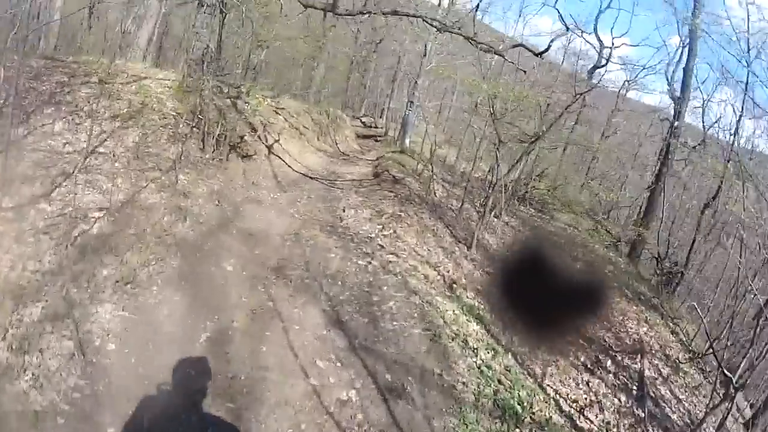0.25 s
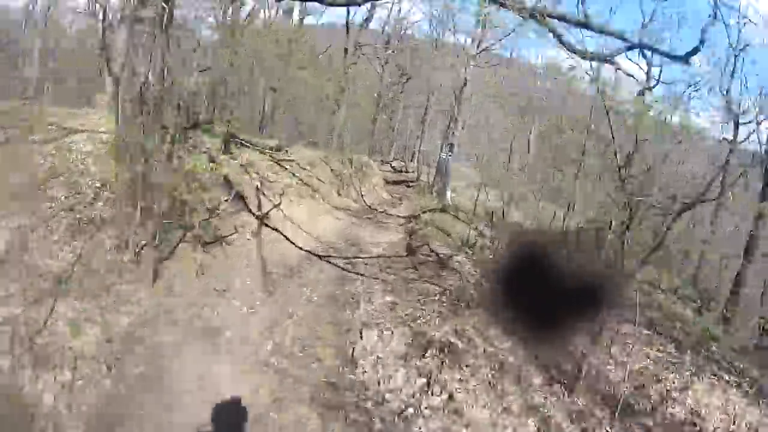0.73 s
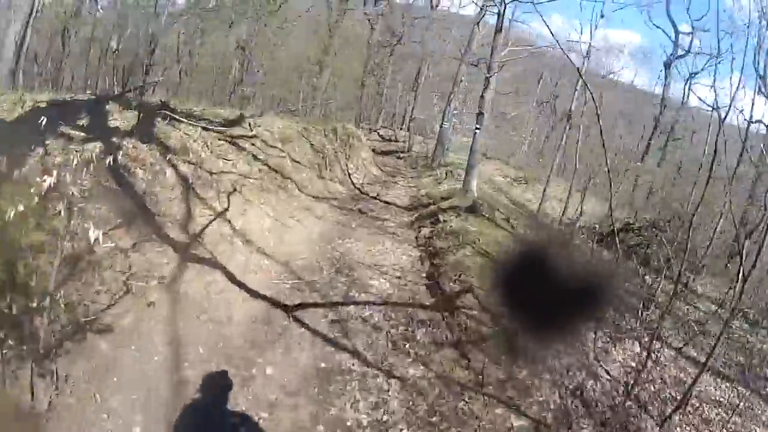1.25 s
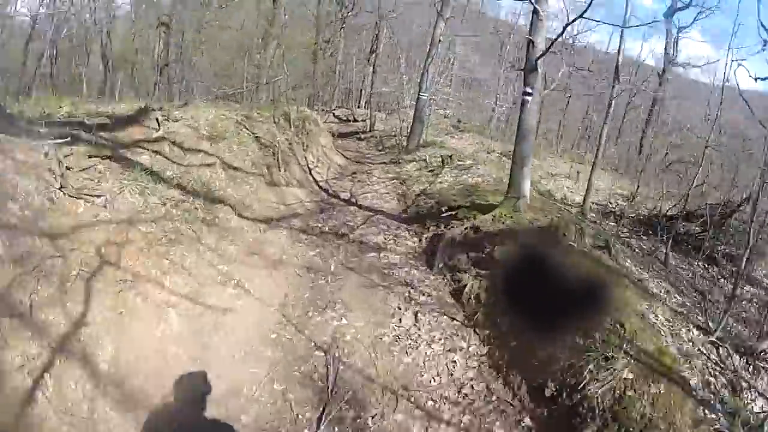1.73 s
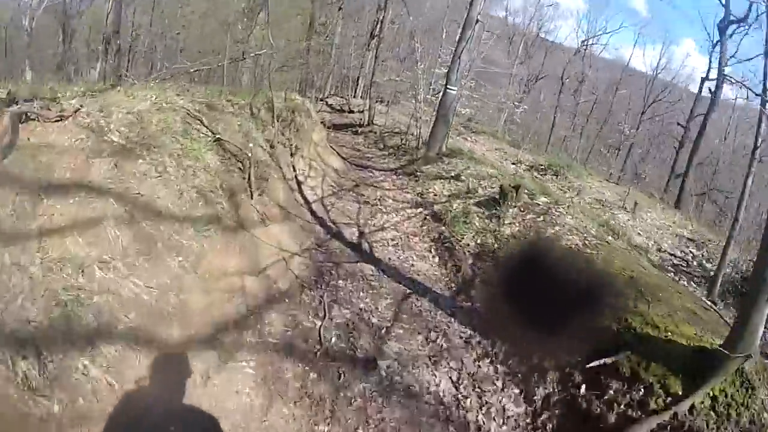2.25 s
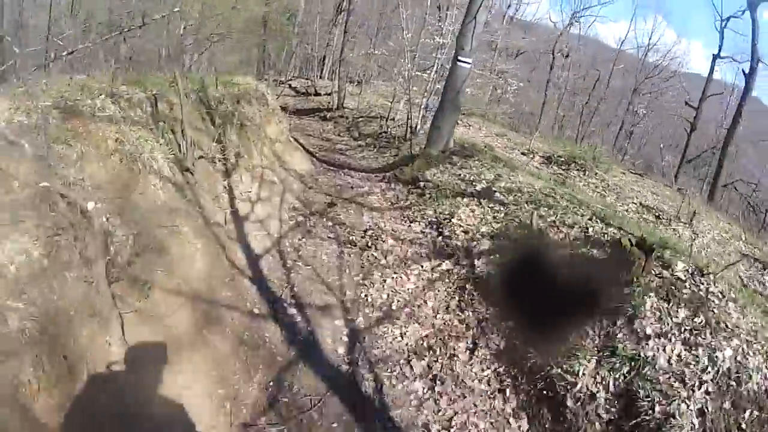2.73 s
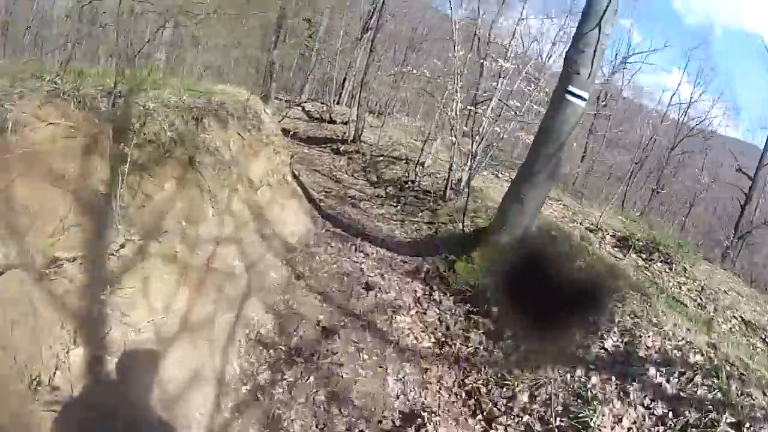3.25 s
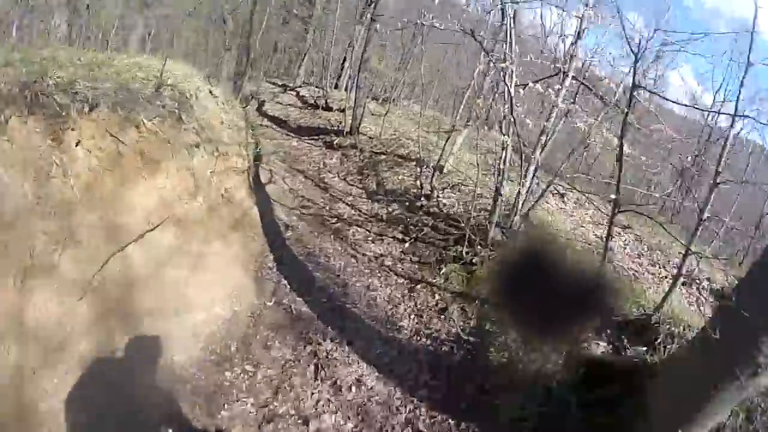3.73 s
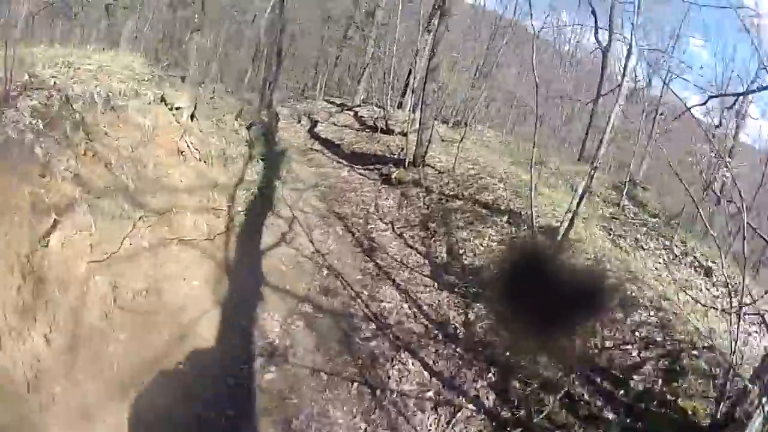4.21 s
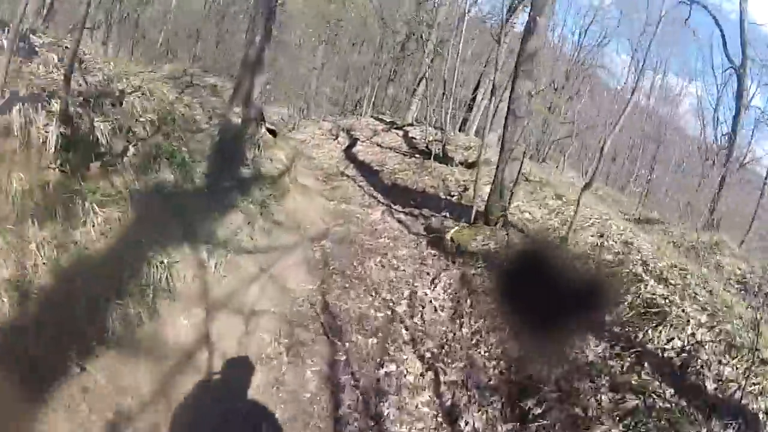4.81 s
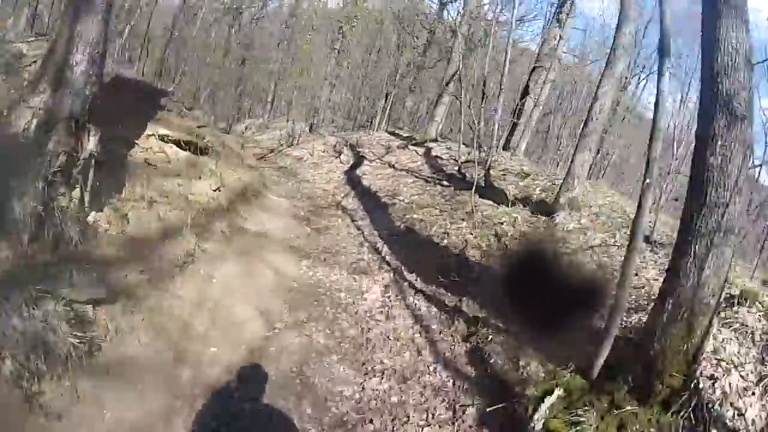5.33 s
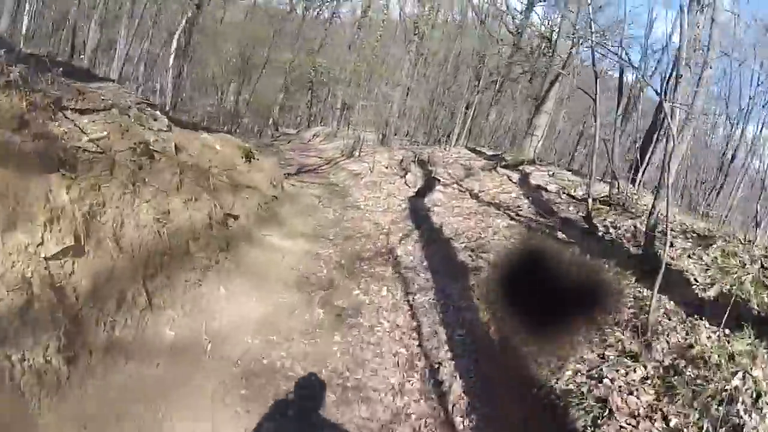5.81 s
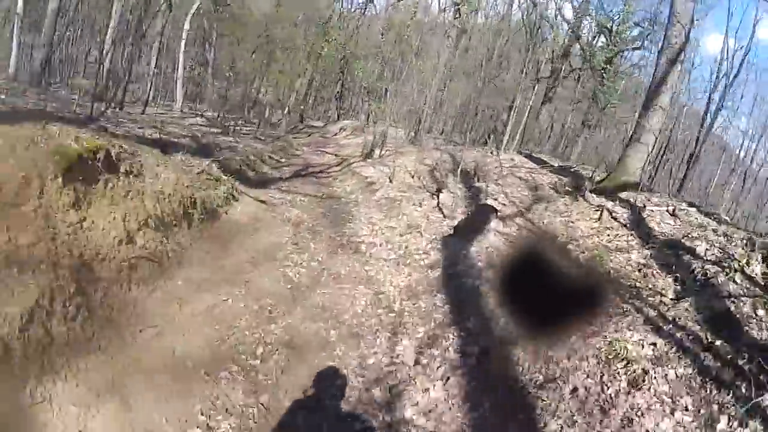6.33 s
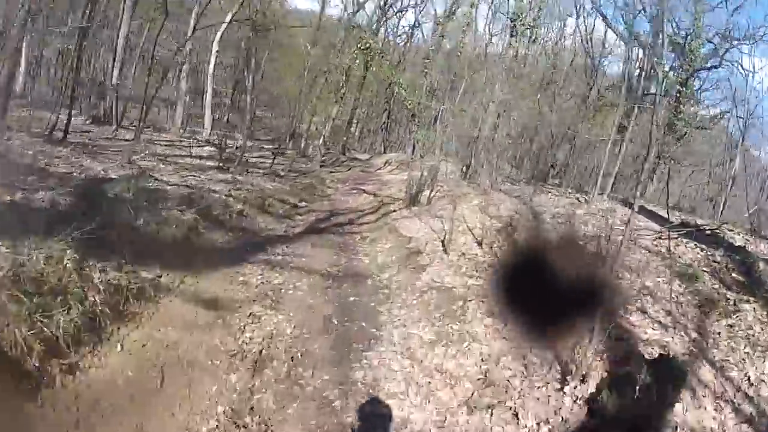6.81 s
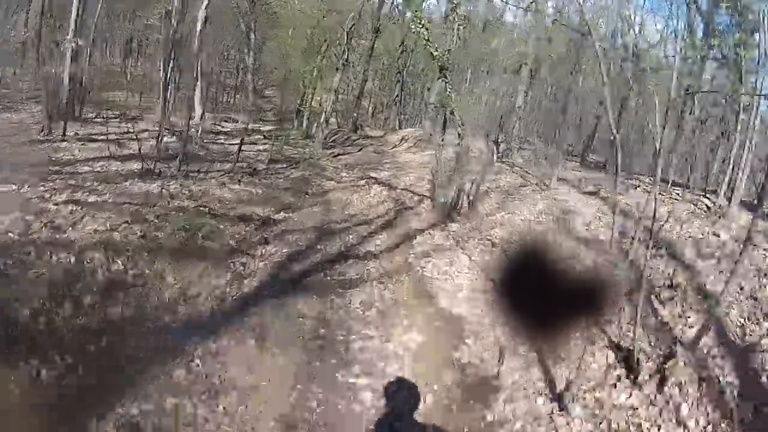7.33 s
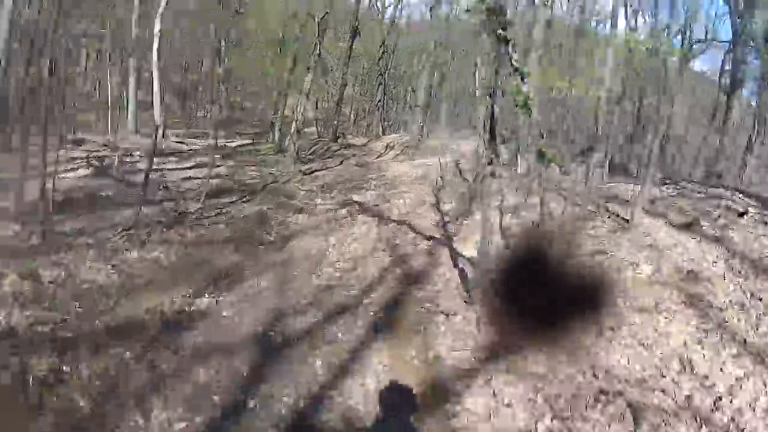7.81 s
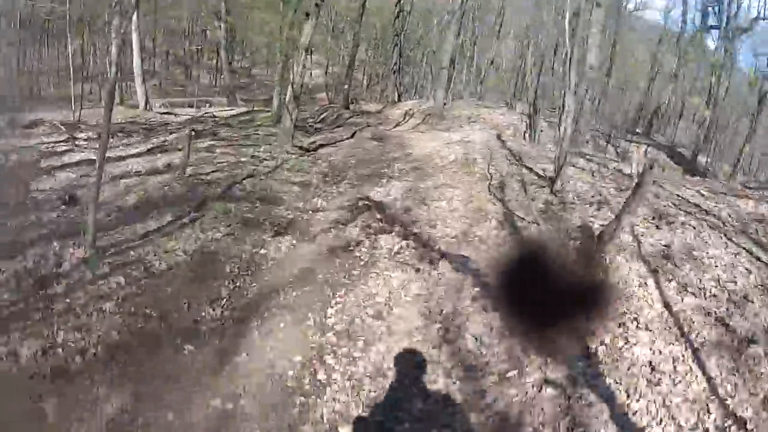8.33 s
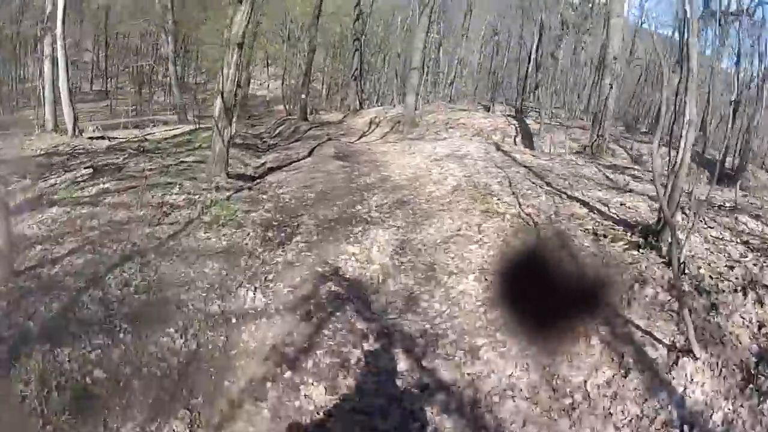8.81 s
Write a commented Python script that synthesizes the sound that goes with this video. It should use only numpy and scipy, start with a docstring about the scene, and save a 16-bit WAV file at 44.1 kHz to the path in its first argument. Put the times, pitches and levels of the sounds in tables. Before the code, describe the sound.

A mountain bike coasts over dry leaves, tyres crunching and freewheel whirring, while wind rumbles and the camera case knocks over bumps.

```python
"""A dry, leafy woodland path, from a coasting mountain bike; the microphone is a cased camera's, on the rider.
Just below, tyres hum and crush leaves and twigs, the freewheel's pawls whirr and the chain slaps.
Right at the microphone air buffets the case, which knocks and, on the rough stretch, scrapes in its mount.
Hollows jolt the bike, a faint thin tone runs under it all, and near the end a bird whistles far off.
The plastic shell colours the knocks and the crunch; the camera adds a gritty treble."""
import sys
import numpy as np
from scipy import signal
from scipy.fft import rfft, irfft
from scipy.io import wavfile

SR = 44100
rng = np.random.default_rng(int(sys.argv[2]) if len(sys.argv) > 2 else 0)


def generate_wav(signal):
    """Clip the signal to [-1, 1] and save it as 16-bit WAV at the path in sys.argv[1]."""
    frames = np.transpose(np.atleast_2d(signal))
    scaled = np.clip(frames, -1, 1) * 32767
    pcm = np.round(scaled).astype(np.int16)
    wavfile.write(sys.argv[1], SR, pcm)


N = 399546
TIME = np.arange(N) / SR

# tyres on the path: time_s, hum_db, crunch_db, sizzle_db
ROLLING = [(0, -50, -58.5, -73), (.8, -51.5, -60, -72), (1.25, -47, -54.5, -73), (1.5, -49, -58, -79),
           (2.2, -47.5, -55.5, -88), (2.9, -52.5, -59, -74), (3.25, -50.5, -54.5, -70),
           (4.0, -49, -58.5, -68), (4.7, -43, -56.5, -80), (6.9, -46, -54.5, -70), (7.7, -50.5, -59, -67),
           (9.06, -52, -57.5, -67)]
# speed of the ratchet: time_s, clicks_per_s
RATCHET_RATE = [(0, 297), (.8, 297), (1.8, 306), (2.3, 280), (2.6, 279), (6.3, 333), (9.06, 310)]
# coasting between pedal strokes: start_s, end_s, level_db
COASTING = [(0, 0.173, -61.5), (0.38, .42, -59), (.5, 1.097, -66.5), (1.603, 1.965, -63),
            (2.18, 2.706, -64), (3.0, 3.6, -63), (3.997, 6.1, -67), (6.248, 7.3, -65.5), (7.602, 9.06, -62)]
# air on the case: time_s, level_db
WIND_LEVEL = [(0, -47.5), (.7, -41), (1.22, -44), (1.42, -37), (1.65, -43), (2.4, -41), (2.65, -49.5),
              (3.15, -44), (3.35, -35), (4.2, -39), (4.58, -33), (4.8, -43.5), (5.5, -38.5), (5.74, -33),
              (5.9, -41.5), (9.06, -41.5)]
# the case hits its mount: start_s, swing_db, shell_db, clack_db, overtone_db
CASE_KNOCKS = [(0.256, -50, -54, -71, -48), (0.4388, -62, -43.5, -48.5, -47.5), (0.456, -42, -50, -59, -38),
               (3.272, -35, -65, -54.5, -55), (3.3546, -39, -33, -30, -38.5), (3.414, -43, -49, -42.5, -55),
               (3.5337, -12.5, -28, -26.5, -22), (3.6055, -31.5, -48, -54, -50),
               (3.643, -44, -38, -36, -38.5), (3.7488, -25.5, -27, -28, -27),
               (3.8433, -35, -37.5, -37, -39), (3.854, -21, -37.5, -34, -34),
               (4.1209, -13, -27.5, -22.5, -35.5), (4.257, -14, -28, -24.5, -32.5),
               (4.3148, -24.5, -35, -32.5, -25.5), (4.3287, -27, -37, -28, -35),
               (4.4332, -30.5, -51, -43, -40), (4.4906, -46, -37.5, -37, -46),
               (4.567, -31.5, -31.5, -31, -35.5), (4.6733, -26.5, -46.5, -39.5, -39),
               (4.733, -40.5, -47.5, -48.5, -42.5), (4.8645, -35, -27.5, -31.5, -39),
               (4.967, -27.5, -47, -52.5, -38.5), (5.1259, -26, -38.5, -36, -38.5),
               (5.243, -34.5, -41.5, -45, -45), (5.378, -44, -51.5, -52.5, -41.5),
               (5.6991, -18.5, -37, -32, -55), (5.837, -23, -34.5, -39, -26.5),
               (5.9025, -24, -37.5, -38.5, -37), (5.975, -35, -46, -51, -53),
               (6.092, -36.5, -46.5, -45, -45), (6.264, -22, -33.5, -31.5, -33.5),
               (6.327, -28, -35, -38, -44), (6.3784, -29.5, -26, -30.5, -37.5),
               (6.495, -42, -38, -41.5, -36.5), (6.547, -37, -43.5, -46, -46),
               (7.0262, -33, -37.5, -36.5, -28.5), (7.2845, -29.5, -27, -30, -37)]
# twigs and grit under the tyres: start_s, peak_db
TWIG_SNAPS = [(.259, -37.5), (.4405, -30.5), (.457, -35.5), (7.342, -41), (8.314, -37.5), (8.597, -36),
              (8.706, -38.5), (8.93, -41)]
# slaps of the chain: start_s, peak_db
CHAIN_SLAPS = [(1.18, -37), (1.246, -42), (1.329, -40.5), (1.682, -37.5), (1.753, -44), (3.2874, -42),
               (3.652, -41.5), (4.333, -32.5), (4.339, -33.5), (5.635, -34), (6.48, -40), (6.879, -42.5),
               (7.803, -46)]
# the wheels drop into hollows: start_s, pitch_hz, level_db, t60_s
HOLLOWS = [(1.46, 60, -28, 0.13), (3.277, 65, -25.5, 0.14), (4.333, 46.2, -13.5, 0.27),
           (5.632, 57.4, -21, 0.19), (5.719, 46, -27, 0.35)]
# the case slides in its mount: start_s, length_s, shell_db, hardness_db
CASE_SCRAPES = [(3.379, 0.2, -50.5, 7.5), (3.7, 0.051, -38.5, 7.5), (3.75, 0.04, -41.5, -6.5),
                (3.855, 0.064, -36.5, -4), (4.408, 0.072, -40.5, 2.5), (4.543, 0.038, -42, 6),
                (4.577, 0.088, -48, -4), (4.829, 0.037, -43.5, -2.5), (5.048, 0.093, -48.5, 0.5),
                (5.244, 0.079, -48.5, -5.5), (5.41, 0.065, -51.5, 0), (5.594, 0.036, -41.5, -3),
                (5.835, .12, -46.5, -1), (6.11, 0.031, -44, -3.5), (6.494, 0.036, -44.5, 2),
                (6.565, .1, -38.5, -2.5), (6.676, 0.045, -46.5, -2), (6.75, 0.057, -36.5, 9),
                (6.789, 0.089, -48, -0.5), (6.934, 0.057, -39, 3), (6.967, 0.13, -40, -3),
                (7.116, 0.042, -41, -3)]
# a distant bird: start_s, length_s, first_hz, last_hz, peak_db
BIRD_NOTES = [(7.679, 0.24, 2523, 2370, -56), (7.823, 0.22, 2790, 2620, -64)]

# resonances, all as: pitch_hz, width_hz, gain_db
TYRE_MODES = [(126.6, 81, 1), (188, 94, -1), (374, 103, -5.5)]  # tyres and frame
WALL_MODES = [(727, 340, 1), (1166, 250, 2), (1812, 370, 3), (2484, 220, 5), (3160, 560, -5.5),
              (3670, 250, -1.5), (4500, 940, -9), (5130, 1700, -11)]  # outside sound coming through the case
LEAF_MODES = [(5130, 2000, 0)]  # the brightest hiss of dry leaves
HUB_MODES = [(2510, 270, -6.5), (2670, 220, -3), (3354, 260, 3), (3710, 160, -1), (3803, 103, 7),
             (4300, 160, -4.5)]  # the hub, rung by its pawls
AIR_MODES = [(25.2, 20, 0.5), (42.6, 15.8, 3), (76, 24, -16)]  # buffeting air
CASE_MODES = [(506, 95, -9.5), (720, 130, 3.5), (964, 120, 1), (1130, 90, -1.5), (1735, 340, 2),
              (1890, 240, -2), (2210, 77, -5.5), (2640, 29, -29), (2804, 120, -16.5), (3590, 206, -17.5),
              (4420, 7200, -47.5)]  # the struck case
LINK_MODES = [(3480, 1340, 1), (4750, 440, 6), (5010, 700, 0.5)]  # chain links
MOUNT_MODES = [(167.2, 66.5, 7), (400, 133, -5)]  # the camera mount


def undb(db):
    """Decibels to gain."""
    return 10 ** (np.asarray(db) / 20)


def unit(x):
    """Scale to rms 1."""
    return x / np.sqrt(np.mean(x ** 2) + 1e-18)


def with_energy(x, db, seconds):
    """Give a sound the energy of a level held for some seconds."""
    return x * undb(db) * np.sqrt(seconds * SR / (np.sum(x ** 2) + 1e-18))


def curve(table, column=1):
    """One column of a table, joined by straight lines in time."""
    rows = np.array(table)
    return np.interp(TIME, rows[:, 0], rows[:, column])


def add(out, start, x):
    """Mix a sound in at a time in seconds."""
    i = max(int(start * SR), 0)
    out[i:i + len(x)] += x[:max(N - i, 0)]


def wander(per_s):
    """Straight lines between random values, with a spread near 1."""
    knots = rng.standard_normal(2048)
    return 1.5 * np.interp(TIME * per_s, np.arange(len(knots)), knots)


def ring(x, modes, size=4096):
    """Pass a sound through resonances, as a causal response."""
    f = np.arange(size // 2 + 1) * SR / size
    power = sum(undb(2 * db) / (1 + 2 * ((f - hz) / width) ** 2) ** 2 for hz, width, db in modes)
    # folding the cepstrum gives minimum phase
    cepstrum = irfft(np.log(power + 1e-12) / 2)
    cepstrum[1:size // 2] *= 2
    cepstrum[size // 2 + 1:] = 0
    response = irfft(np.exp(rfft(cepstrum)))
    return signal.fftconvolve(x, response)[:len(x)]


def grains(count, per_s, spread_db):
    """Tiny clicks of uneven strength at random times."""
    hit = rng.random(count) < per_s / SR
    return hit * rng.standard_normal(count) * undb(spread_db * np.minimum(rng.exponential(size=count), 4))


def tyres():
    """Below the microphone, knobs drum on packed dirt and crush dry leaves, patch by patch."""
    drumming = unit(ring(rng.standard_normal(N), TYRE_MODES))
    hum = drumming * undb(curve(ROLLING, column=1) + 1.32 * wander(12))
    leaves = unit(grains(N, per_s=2600, spread_db=2.2)) + 1.35 * rng.standard_normal(N)
    crunch = unit(ring(leaves, WALL_MODES)) * undb(curve(ROLLING, column=2) + 1.15 * wander(35))
    fine_cracks = grains(N, per_s=5300, spread_db=2.5)
    sizzle = unit(ring(fine_cracks, LEAF_MODES)) * undb(curve(ROLLING, column=3))
    return hum + crunch + sizzle


def freewheel(engage_s=0.005, fade_s=0.11, wheel_turn_s=0.659):
    """Down at the hub, pawls drop over ratchet teeth so fast that they merge into a thin, gliding whirr."""
    tooth_phase = np.cumsum(curve(RATCHET_RATE) * (1 + .016 * wander(20))) / SR % 1
    drops = np.exp(-((tooth_phase - .5) / .012) ** 2)
    clicks = unit(ring(drops * undb(2 * wander(300)), HUB_MODES))
    sliding = unit(ring(rng.standard_normal(N) * np.exp(-tooth_phase / 0.39), HUB_MODES))
    whirr = .87 * clicks + .5 * sliding
    level = np.zeros(N)
    for start, end, db in COASTING:
        engage = np.clip((TIME - start) / engage_s, 0, 1)
        fade = np.exp(-np.maximum(TIME - end, 0) / fade_s)  # the pedals catch up
        level += undb(db) * engage * fade
    swell_db = 0.5 * np.cos(2 * np.pi * (TIME - 4.47) / wheel_turn_s)
    return whirr * level * undb(swell_db + 2.7 * wander(20))


def wind(gust_db=1.5):
    """Air buffets the case in gusts, a low rumble right at the microphone."""
    rumble = unit(ring(rng.standard_normal(N), AIR_MODES, size=32768))
    return rumble * undb(curve(WIND_LEVEL) + gust_db * wander(5.4))


def whine(pitch_hz=3430, level_db=-74.5):
    """A very faint, thin tone that barely leaves its pitch and wavers in level."""
    phase = np.cumsum(pitch_hz * (1 + 0.00295 * wander(30))) / SR
    return unit(np.sin(2 * np.pi * phase)) * undb(level_db + 2.5 * wander(11))


def case_ring(contact, detune, bright_db, shell_below_hz=1400, bright_above_hz=2300):
    """The case's low shell modes and its hard clack; each point of contact weights the modes anew."""
    modes = np.array(CASE_MODES, float)
    chance = rng.standard_normal((len(modes), 2))
    low, high = modes[:, 0] < shell_below_hz, modes[:, 0] > bright_above_hz
    modes[:, 0] *= 1 + detune * chance[:, 0]
    modes[:, 2] += 2.4 * chance[:, 1] + bright_db * high
    return ring(contact, modes[low]), ring(contact, modes[~low])


def blow(swing_db, shell_db, clack_db, overtone_db, count=4096):
    """Plastic chatters for a few milliseconds while the whole camera swings on its mount."""
    t = np.arange(count) / SR
    # a heavy blow seats the case at once, a light one chatters longer
    press = t / np.interp(swing_db, [-30, -14], [.0013, .0008])
    chatter = press ** 2 * np.exp(-1.25 * press) + 0.078 * np.exp(-t / 0.0096)
    contact = rng.standard_normal(count) * chatter
    # an edge-on tap with little weight behind it reaches the highest modes
    bright_db = np.interp(clack_db - swing_db, [-12, 6], [-3, 5])
    shell, clack = case_ring(contact, detune=0.022, bright_db=bright_db)
    # the mount gives way with a heavily damped swing; glancing blows ring its overtone instead
    swing_hz = 184.5 + 1.44 * (shell_db - swing_db)
    overtone_hz = 365 * (1 + 0.11 * rng.standard_normal())
    onset = 1 - np.exp(-(t / 0.0021) ** 2)
    swing = onset * np.sin(2 * np.pi * swing_hz * t + 0.48) * np.exp(-t / 0.0062)
    overtone = onset * np.sin(2 * np.pi * overtone_hz * t) * np.exp(-t / 0.0051)
    thump = with_energy(swing, swing_db, 0.032) + with_energy(overtone, overtone_db, 0.03)
    return thump + with_energy(shell, shell_db, 0.027) + with_energy(clack, clack_db, 0.029)


def knocks(rebound_s=0.01):
    """At the microphone itself, each bump throws the case against its mount; it rebounds once, softly."""
    out = np.zeros(N)
    rebound_db = np.array([-11, -17.5, -17.5, -11])  # swing, shell, clack, overtone
    for start, *levels_db in CASE_KNOCKS:
        add(out, start, blow(*levels_db))
        delay_s = rebound_s * (1 + 0.252 * rng.uniform(-0.993, 1))
        add(out, start + delay_s, blow(*(levels_db + rebound_db)))
    return out


def crackles(events, modes, decay_s, count=2048):
    """Each event is a quick cluster of tiny clicks that rings the given modes."""
    out = np.zeros(N)
    fade = np.exp(-np.arange(count) / SR / decay_s)
    for start, peak_db in events:
        cluster = ring(grains(count, per_s=5000, spread_db=1.5) * fade, modes)
        add(out, start, undb(peak_db) * cluster / (np.abs(cluster).max() + 1e-9))
    return out


def twigs():
    """Dry twigs and grit snap under the tyres, heard through the wall of the case."""
    return crackles(TWIG_SNAPS, WALL_MODES, decay_s=0.0019)


def chain(bounce_s=0.016, bounce_db=-7):
    """Down by the rider's feet the chain slaps, and its links land again more lightly."""
    bounces = [(start + bounce_s * (.5 + rng.random()), db + bounce_db) for start, db in CHAIN_SLAPS]
    return crackles(CHAIN_SLAPS + bounces, LINK_MODES, decay_s=0.0054)


def jolts():
    """Each hollow shakes bike, rider and microphone with a deep, dying thud."""
    out = np.zeros(N)
    t = np.arange(16384) / SR
    for start, hz, db, t60 in HOLLOWS:
        add(out, start, -undb(db - 60 * t / t60) * np.sin(2 * np.pi * hz * t))
    return out


def scrapes(tail_s=0.028):
    """Right at the microphone, the case slides in its mount in dense, uneven slips that ring both."""
    out = np.zeros(N)
    slips = grains(N, per_s=5300, spread_db=-2.5) * undb(2 * wander(200))
    for start, length, db, hardness_db in CASE_SCRAPES:
        t = np.arange(int((length + tail_s) * SR)) / SR
        grip = np.minimum(t / 0.014, 1) * np.exp(-np.maximum(t - length, 0) / 0.0037)
        contact = grip * slips[int(start * SR):][:len(t)]
        shell, clack = case_ring(contact, detune=0.033, bright_db=0)
        # a hard scrape has less thump and more clack
        thump = with_energy(ring(contact, MOUNT_MODES), db + 6 - hardness_db, length)
        clack = with_energy(clack, db - 7.5 + hardness_db, length)
        add(out, start, thump + with_energy(shell, db, length) + clack)
    return out


def bird():
    """A faint bird far off in the wood: thin notes that swell and sag in pitch."""
    out = np.zeros(N)
    for start, length, first_hz, last_hz, db in BIRD_NOTES:
        progress = np.linspace(0, 1, int(length * SR))
        hz = first_hz + (last_hz - first_hz) * progress ** 2
        swell = np.sin(np.pi * progress) ** 0.62
        add(out, start, undb(db) * swell * np.sin(2 * np.pi * np.cumsum(hz) / SR))
    return out


def scene():
    """Inside the case both channels hear the same sound."""
    steady = tyres() + freewheel() + wind() + whine()
    mono = steady + knocks() + twigs() + chain() + jolts() + scrapes() + bird()
    return np.array([mono, mono])


def record(dry, cutoff_hz=5600, hold_hz=12000, top_hz=15400):
    """The camera clips, drops the top and holds samples as steps, mirroring the sound into the treble."""
    hz = np.maximum(np.arange(N // 2 + 1) * SR / N, 1)
    spectrum = rfft(np.clip(dry, -1, 1)) / np.sqrt(1 + (hz / cutoff_hz) ** 36)
    # the steps grow with the slope of the wave and appear on both sides of the hold rate
    steps = irfft(spectrum * hz, N) * 2 * np.cos(2 * np.pi * hold_hz * TIME)
    mirrored = undb(0.67) * rfft(steps) / np.maximum(hz, hold_hz / 2)
    held = irfft(spectrum + mirrored, N)
    return signal.sosfilt(signal.ellip(10, .2, 70, top_hz, fs=SR, output="sos"), held)


dry = scene()
out = record(dry)
generate_wav(out)
```